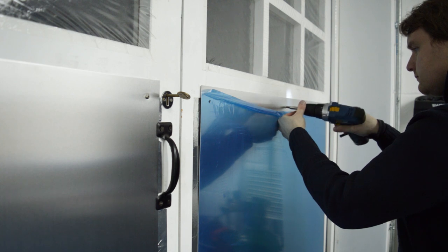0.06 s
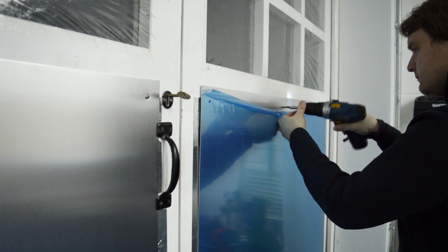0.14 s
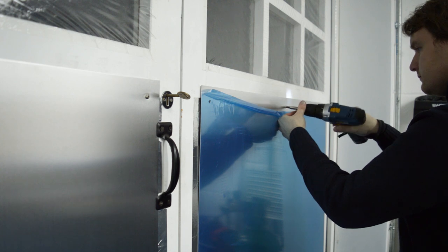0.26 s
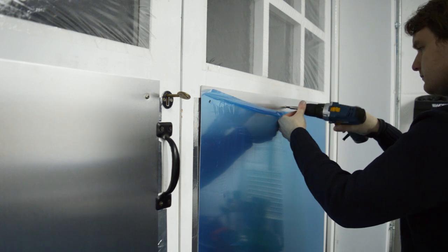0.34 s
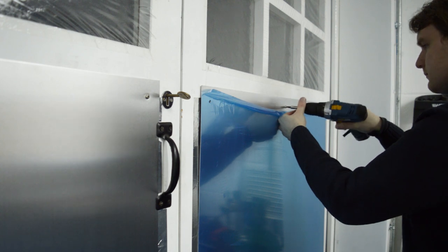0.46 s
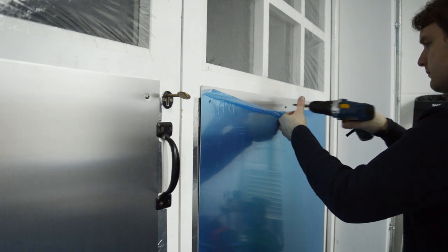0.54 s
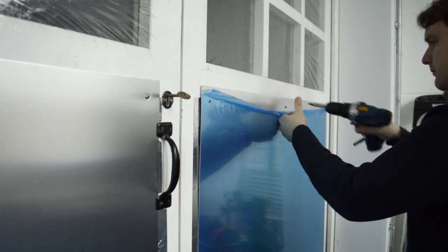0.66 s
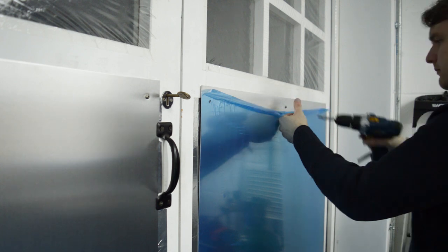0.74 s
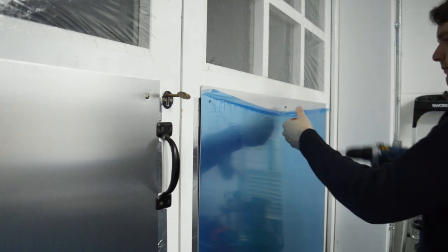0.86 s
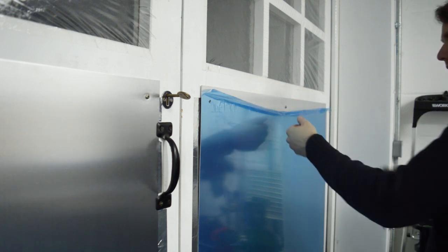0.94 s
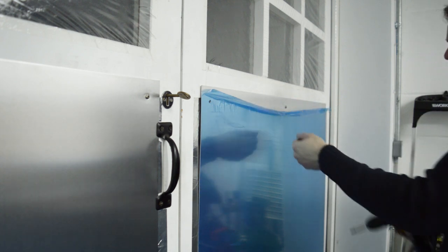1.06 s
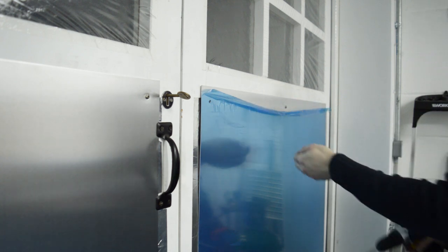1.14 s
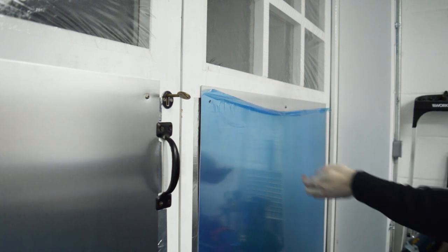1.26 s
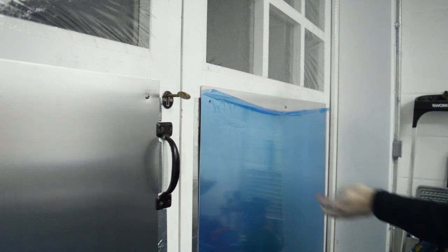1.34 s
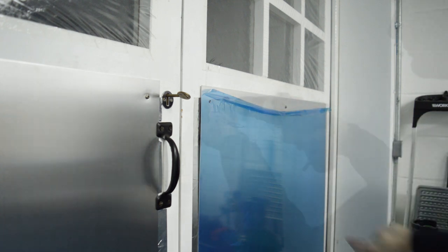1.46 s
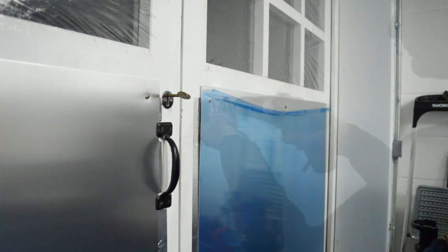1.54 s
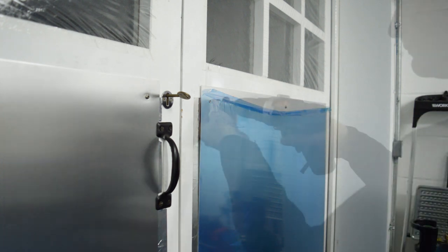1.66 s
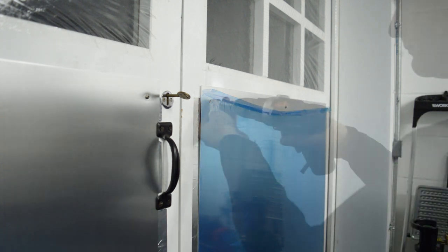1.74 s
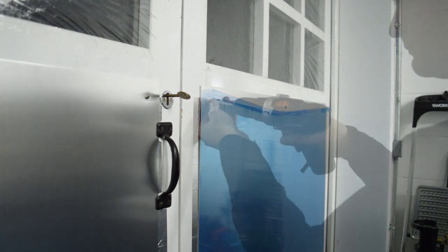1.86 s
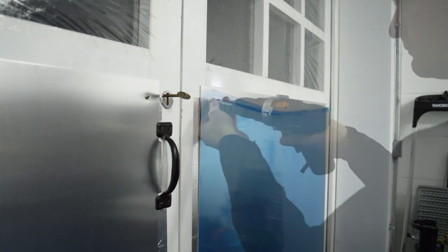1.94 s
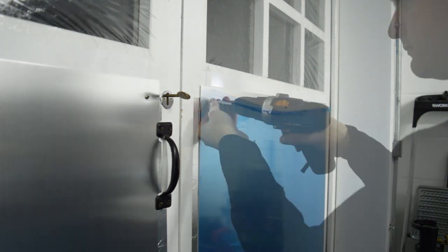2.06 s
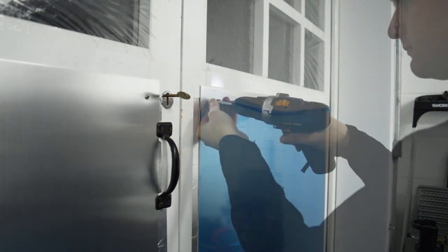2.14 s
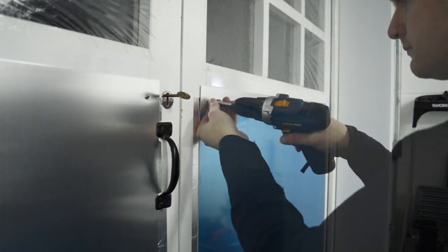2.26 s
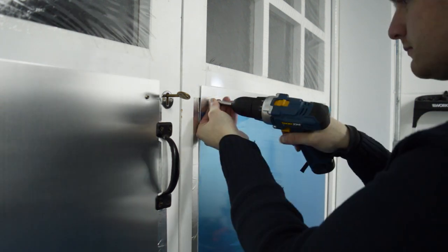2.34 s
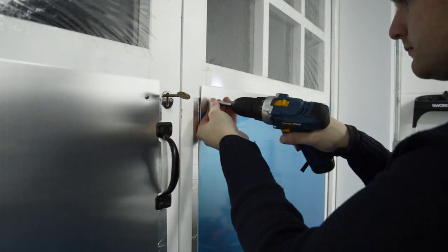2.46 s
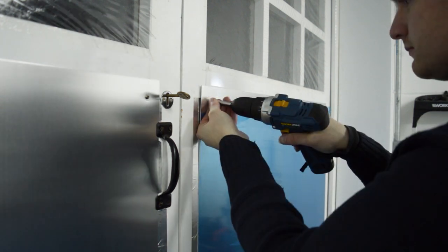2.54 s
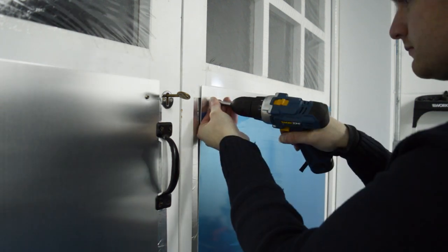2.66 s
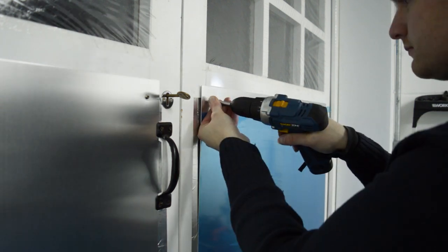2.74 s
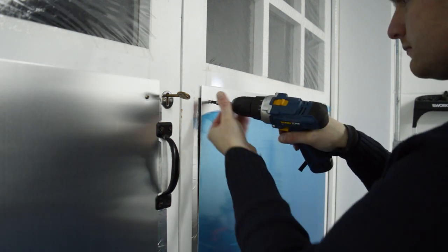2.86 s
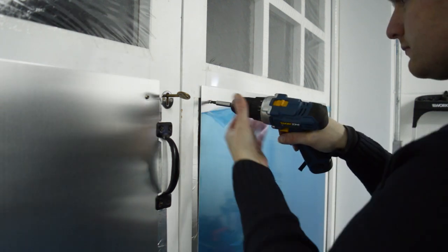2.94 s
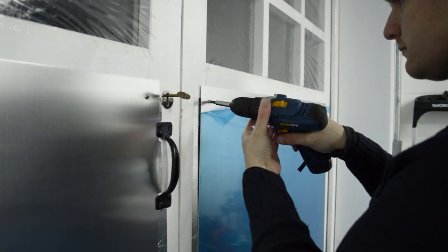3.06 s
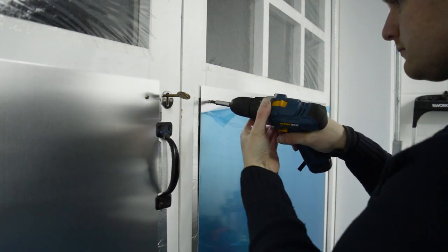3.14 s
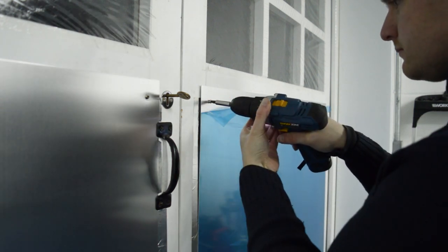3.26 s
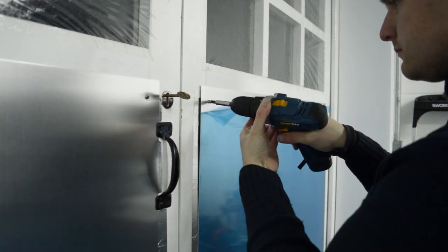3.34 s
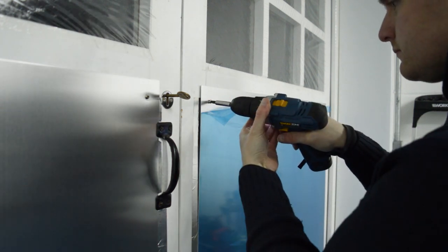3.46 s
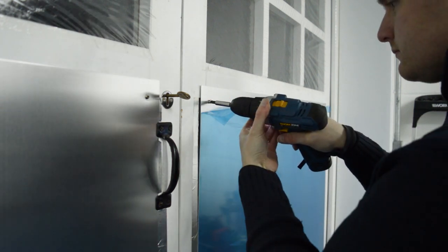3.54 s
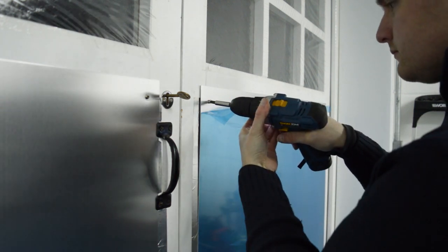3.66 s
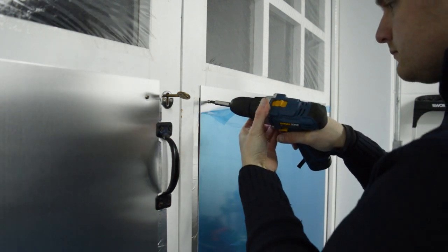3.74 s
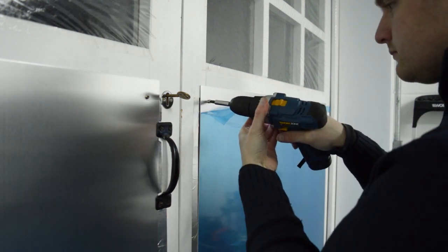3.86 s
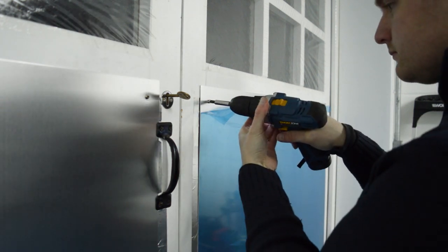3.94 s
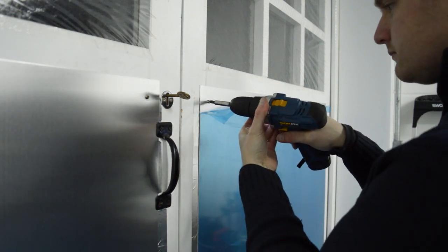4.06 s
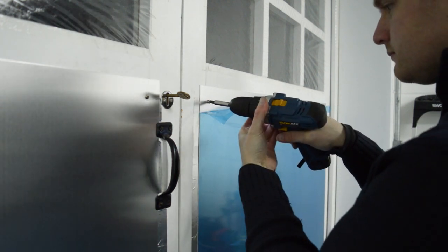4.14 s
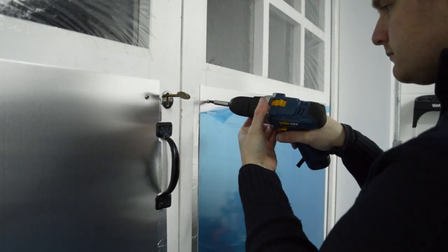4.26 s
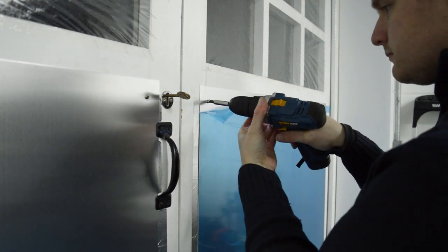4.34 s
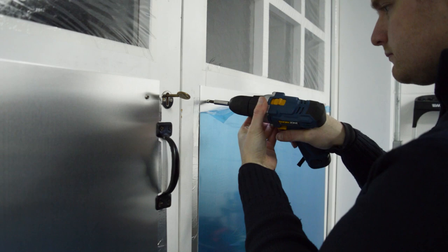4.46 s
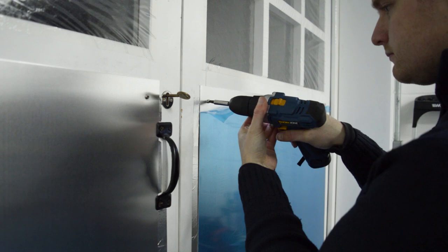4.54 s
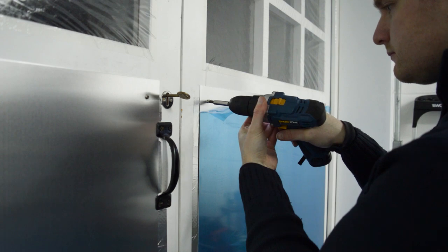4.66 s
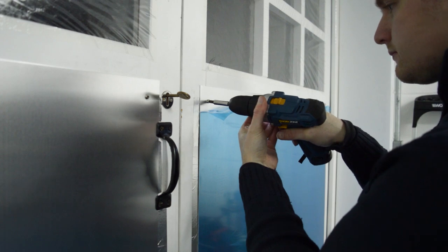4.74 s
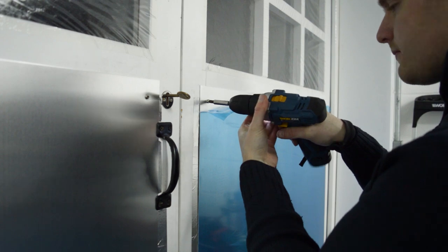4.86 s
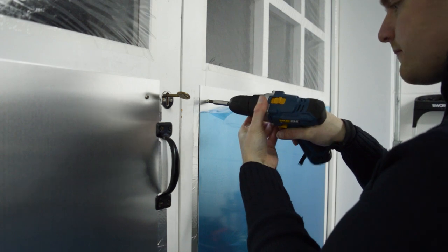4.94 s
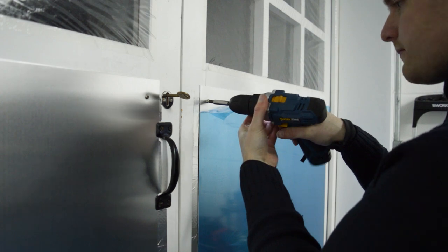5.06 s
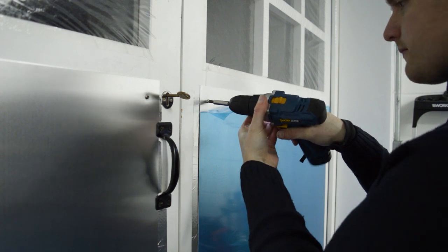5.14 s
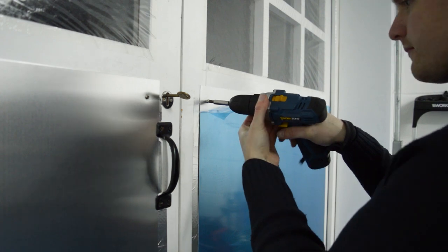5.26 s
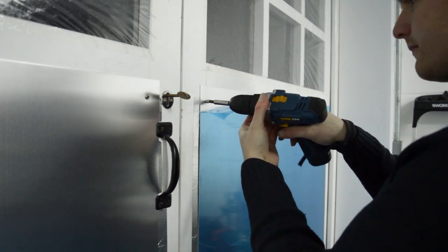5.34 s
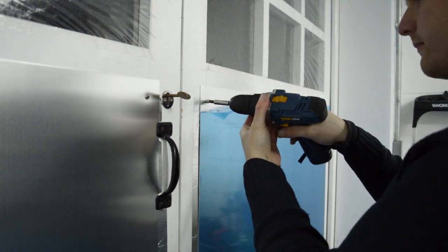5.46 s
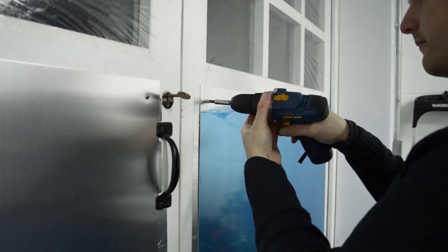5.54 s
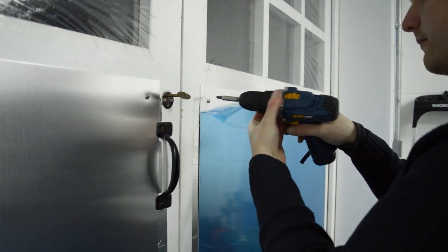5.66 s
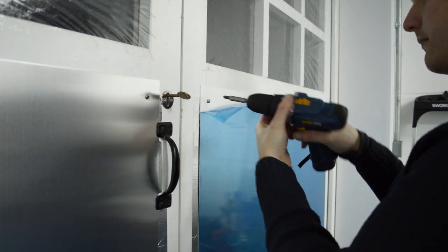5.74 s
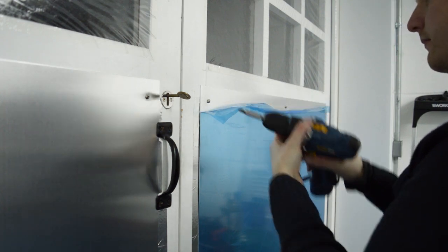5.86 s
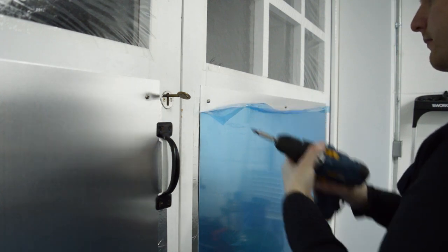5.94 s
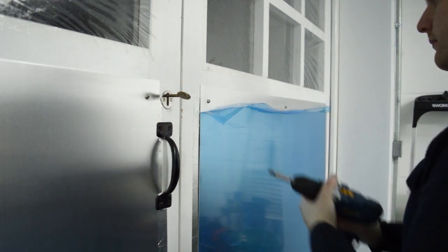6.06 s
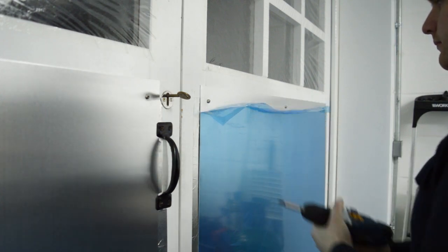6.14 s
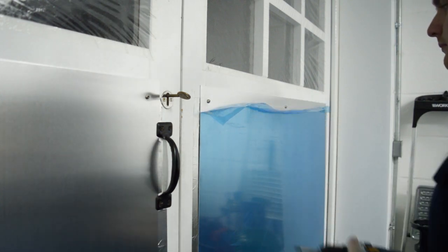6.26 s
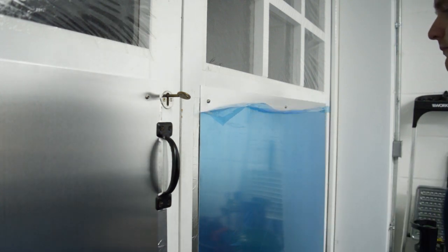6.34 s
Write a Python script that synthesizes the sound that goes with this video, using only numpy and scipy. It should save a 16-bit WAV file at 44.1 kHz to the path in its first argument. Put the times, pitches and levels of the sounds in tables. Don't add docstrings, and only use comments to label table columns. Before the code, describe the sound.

Close pickup in a reverberant, hard-walled workshop. A loud knock on a door panel dies away over faint room hum. A cordless driver grinds slowly, spins up quickly with a gritty gear whine and airy hiss, then winds down. Pressed to the door, it starts again low, rises and labours, with a thin electronic whine above. Rapid hard clutch snaps thud into the door, then it halts, leaving echo and faint ticks.

```python
import sys
import numpy as np
from scipy import signal
from scipy.fft import rfft, irfft
from scipy.io import wavfile
from scipy.ndimage import uniform_filter1d

SR = 44100
rng = np.random.default_rng(int(sys.argv[2]) if len(sys.argv) > 2 else 0)


def to_linear_factor(level_db):
    exponent = np.asarray(level_db, float) / 20
    return 10 ** exponent


def waveform_to_disk(signal):
    frames = np.transpose(np.atleast_2d(signal))
    scaled = np.clip(frames, -1, 1) * 32767
    samples = np.round(scaled).astype(np.int16)
    wavfile.write(sys.argv[1], SR, samples)


N = 282240

START_S, SLIP_S, STOP_S = 1.37, 4.875, 5.325
TOUCH_S = 2.97
MESH_PER_TURN = 9.32
TOP_HZ = 16300


def motor():
    t = np.arange(N) / SR
    speed, load = shaft_speed()
    law = levels(speed, load)
    swell = np.where(t < 1, 1, np.clip(t - START_S, 0, 1) ** 0.84)
    speed = speed * (1 + .0008 * drift(25))
    turns = np.cumsum(speed) / SR
    mesh_db, shaft_db = stage_levels()
    tones = gear_mesh(turns, speed, mesh_db + law["mesh"], law["sharp"], law["planets"])
    tones += commutator(turns, speed, shaft_db + law["commutator"], law["upper"])
    segments = np.cos(6 * np.pi * turns)
    whine = controller_whine(load, segments)
    noise = motor_noise(turns, segments, law)
    return swell * tones, swell * whine, swell * noise


# start in seconds, goal speed in turns/s, lag of the drift toward it in seconds.
TRIGGER_MOVES = [
    (1.831, 419, 2.225),
    (1.94, 133.5, .165),
    (2.271, 294.4, .048),
    (2.664, -883.2, 2.218),
    (2.963, 1.13, .347),
    (3.164, 73.9, .032),
    (3.238, 68.45, .987),
    (3.606, 114.3, .124),
]


def shaft_speed():
    creep_turns_per_s, bite_s, bite_loss_turns_per_s = 52.4, 4.087, 50
    t, speed = np.arange(N) / SR, np.full(N, creep_turns_per_s)
    for s, goal, lag_s in TRIGGER_MOVES:
        i = round(s * SR)
        speed[i:] = goal + (speed[i] - goal) * np.exp(-(t[i:] - s) / lag_s)
    load = np.clip((t - bite_s) / (SLIP_S - bite_s), 0, 1) ** 2.29
    return speed - bite_loss_turns_per_s * load, load


LEVEL_LAWS = {"mesh": (1, 2, 5.5, -4.5), "sharp": (-0.5, -0.16, 0.38, -0.17),
              "planets": (-1.2, -13, -0.5, 5.5), "commutator": (-0.5, 1, -7, 0), "upper": (-18, 39, 4.5, 1),
              "rumble": (-55.5, 7.5, 5.5, -2.5), "rattle": (-42.5, 14.5, 0, 3.5),
              "hiss": (-42.5, 18, 6, 0.7), "air": (-62, 39.5, 4, 5)}


def levels(speed, load):
    creep_below = 62
    creep = np.clip((creep_below + 8 - speed) / 16, 0, 1) * (load == 0)
    law = {}
    for name, (db, slope_db, load_db, creep_db) in LEVEL_LAWS.items():
        law[name] = db + slope_db * np.log10(speed / 110) + load_db * load + creep_db * creep
    return law


# gear mesh in dB, commutator in dB.
STAGE_LEVELS = [
    (-54.5, -60),
    (-51, -60),
    (-51, -67.5),
    (-45, -50.5),
    (-47.5, -53),
    (-50.5, -61),
    (-47, -69),
    (-48, -64.5),
    (-47.5, -62.5),
]


def stage_levels():
    stage = np.searchsorted(np.array(TRIGGER_MOVES)[:, 0], np.arange(N) / SR)
    return uniform_filter1d(np.array(STAGE_LEVELS, float)[stage].T, size=2500)


# frequency in Hz, level in dB.
HOUSING_RESPONSE = [(700, -15), (1050, -7), (1450, -9), (2000, -6), (2750, 2), (3150, 1), (3450, -3),
                    (3980, 1), (4150, -13), (4550, -5), (6300, -8), (7200, -13), (9700, -9), (13000, -28)]


def gear_mesh(turns, speed, mesh_db, sharp_db, planets_db):
    mesh_hz = MESH_PER_TURN * speed
    free_db = -9 * gate(TRIGGER_MOVES[0][0], TOUCH_S, edge_s=.05)
    mesh_orders = []
    for k in range(1, 17):
        housing_db = at_hz(HOUSING_RESPONSE, k * mesh_hz[::32]).repeat(32) - 99 * (k * mesh_hz > TOP_HZ)
        db = mesh_db + housing_db + sharp_db * (k - 4) + planets_db * (k % 3 == 0)
        db = db + free_db * (k == 1) - 2 * (k == 2)
        mesh_orders.append((k, db))
    return orders(MESH_PER_TURN * turns, mesh_orders, flicker_db=1.8, flicker_hz=20)


# multiple of shaft speed, level in dB.
SHAFT_TONES = [(1, 0), (2, -12), (3, 0), (6, -6), (9, -5), (12, -3), (18, -5), (19, 1), (21, -4), (25, -3),
               (27, -3), (28, 4), (30, 6), (31, 4), (33, 2), (34, -1), (35, -2), (36, 8), (37, -4),
               (38, -5), (40, -4), (41, -7), (43, -10), (45, -9), (46, -10), (48, -13), (50, -13),
               (52, -15)]


def commutator(turns, speed, shaft_db, upper_db):
    shaft_orders = []
    for k, db in SHAFT_TONES:
        small_body_db = 40 * np.log10(np.minimum(k * speed / 215, 1))
        shaft_orders.append((k, shaft_db + db + upper_db * (k > 12) + small_body_db))
    return orders(turns, shaft_orders, flicker_db=1.3, flicker_hz=10)


def orders(turns, levels_db, flicker_db, flicker_hz):
    out, on = np.zeros(N), slice(round(START_S * SR), round(SLIP_S * SR))
    for k, db in levels_db:
        gain = to_linear_factor((db + flicker_db * drift(flicker_hz))[on])
        out[on] += np.sqrt(2) * gain * np.sin(2 * np.pi * (k * turns[on] + rng.random()))
    return out


# on in seconds, off in seconds, level in dB.
CHOPPER_RUNS = [
    (0.093, 0.21, -51),
    (1.391, 1.846, -56),
    (1.854, 1.928, -45),
    (1.985, 2.264, -43.5),
    (3.228, 3.612, -47.5),
    (3.7, 4.873, -45),
]
# Hz at on, Hz at off.
CHOPPER_PITCH = [
    (3700, 3720),
    (3600, 3605),
    (3665, 3670),
    (3685, 3620),
    (3644, 3644),
    (3644, 3646),
]


def controller_whine(load, segments):
    moments, gain = [s for row in CHOPPER_RUNS for s in row[:2]], np.zeros(N)
    for on_s, off_s, db in CHOPPER_RUNS:
        gain += to_linear_factor(db) * gate(on_s, off_s, edge_s=0.01)
    gain = gain * to_linear_factor(-8.5 * load)
    hz = 78 * load ** 2 + np.interp(np.arange(N) / SR, moments, np.ravel(CHOPPER_PITCH))
    phase = 2 * np.pi * np.cumsum(hz) / SR
    wave = np.sin(phase) * (1 + .16 * segments) + to_linear_factor(-19) * np.sin(2 * phase)
    return np.sqrt(2) * wave * gain * to_linear_factor(1.5 + 1.2 * drift(20))


# frequency in Hz, dB per Hz.
RUMBLE_SPECTRUM = [(24, -49.5), (40, -21.5), (214, -2.5), (258, -9.5), (436, -10), (675, -2.5),
                   (792, -10.5), (1010, -4), (1120, -8.5), (1300, -8), (1690, -38), (2860, -120)]
RATTLE_SPECTRUM = [(710, -62), (1200, -26), (1370, -6.5), (2550, -9.5), (2870, -2.5), (3470, -3.5),
                   (3530, -6.5), (4140, -12.5), (5200, -8), (6760, -35.5), (11400, -120)]
HISS_SPECTRUM = [(2820, -30.5), (4800, -3), (5500, -4.5), (6260, 2.5), (7020, 0), (9470, 3), (10900, 0),
                 (11600, -4.5), (15100, -32.5), (22000, -120)]
AIR_SPECTRUM = [(6760, -34.5), (11500, 0), (12600, -2.5), (15200, -6), (15600, -13), (16200, -36)]
# frequency in Hz, width in Hz, level in dB.
BRUSH_HOLDER = [(5900, 120, 4), (9700, 250, 0)]
SLIP_NOISE_DB = (-45.5, -38, -46, -57.5)
EARLIER_NOISE_DB = (-33, -34, -40.5, -75.5)
EARLIER_NOISE_FALL = (170, 75, 135.2, 25)


def motor_noise(turns, segments, law):
    t = np.arange(N) / SR
    driven, slipping = gate(START_S, SLIP_S + .02), gate(SLIP_S, STOP_S + .01)
    earlier = gate(-1, .2, edge_s=.05)
    gains = []
    for name, slip_db, db, fall_db in zip(("rumble", "rattle", "hiss", "air"), SLIP_NOISE_DB,
                                          EARLIER_NOISE_DB, EARLIER_NOISE_FALL):
        gains.append(driven * to_linear_factor(law[name]) + slipping * to_linear_factor(slip_db) + earlier * to_linear_factor(db - fall_db * t))
    rumble_gain, rattle_gain, hiss_gain, air_gain = gains
    white = rng.standard_normal((3, N))
    teeth = 1 + 0.7 * np.cos(2 * np.pi * MESH_PER_TURN * turns)
    sparks = 1 + 0.13 * segments
    touch_db = 3 * gate(TOUCH_S, SLIP_S, edge_s=0.091)
    rumble = rumble_gain * to_linear_factor(touch_db + 2.0 * drift(33)) * coloured(white[0], RUMBLE_SPECTRUM)
    rattle = rattle_gain * to_linear_factor(-2.5 + 1.3 * drift(21)) * coloured(white[1] * teeth, RATTLE_SPECTRUM)
    hiss = hiss_gain * to_linear_factor(1.1 * drift(30)) * coloured(white[2] * sparks, HISS_SPECTRUM)
    hiss = hiss + sum(to_linear_factor(db) * resonance(hiss, hz, width_hz) for hz, width_hz, db in BRUSH_HOLDER)
    air = air_gain * coloured(white[0] * sparks, AIR_SPECTRUM)
    return rumble + rattle + hiss + air


# start in seconds, crack peak in dB, door thud in dB, bounce delay in seconds, bounce in dB.
CLUTCH_TEETH = [(.002, -26.5, -22, 0.0074, -10), (4.8756, -9.5, -19.5, 0.0041, -2.5),
                (4.9466, -10, -20.5, 0.0047, -1.5), (4.9913, -26.5, -34, .004, -6),
                (5.019, -10, -21.5, 0.004, 0), (5.059, -23, -44, 0.0033, -16),
                (5.082, -10.5, -21, 0.0041, 1.5), (5.1223, -16, -35.5, 0.0017, -17.5),
                (5.1464, -10, -24, 0.0066, -15.5), (5.2082, -9.5, -22.5, 0.0059, -4),
                (5.261, -49.5, -32.5, 0.005, -3.5), (5.2876, -10.5, -21, 0.0044, 1.5)]
# frequency in Hz, width in Hz, level in dB.
CLUTCH_MODES = [(3300, 200, 0), (3067, 58, 2), (4630, 600, -5), (9450, 830, -1)]
# start in seconds, length in seconds, start Hz, end Hz, level in dB.
GEAR_STRAIN = [
    (4.928, .015, 4600, 4300, -33),
    (4.93, .014, 3700, 3400, -33),
    (4.999, .019, 4200, 3680, -27),
    (5.067, .015, 4200, 3720, -26),
    (5.131, .015, 4200, 3920, -29),
    (5.192, .014, 4250, 3820, -27),
    (5.259, .009, 4050, 3950, -29),
    (5.269, .011, 4050, 3900, -29),
]


def clutch():
    cracks, blows = np.zeros(N), np.full(N, 1e-18)
    lowpass = signal.butter(2, 11500, fs=SR, output="sos")
    for s, db, thud_db, bounce_s, bounce_db in CLUTCH_TEETH:
        hit = np.zeros(N // 40)
        add(hit, 0, crack(decay_s=.0024))
        add(hit, bounce_s, to_linear_factor(bounce_db - 2.5) * crack(decay_s=.003))
        add(hit, .002, to_linear_factor(-15) * burst(rise_s=0.0016, decay_s=0.011))
        ring = to_linear_factor(1.0) * resonance(hit, 6470, 2000)
        ring += sum(to_linear_factor(mode_db) * resonance(hit, hz, width_hz) for hz, width_hz, mode_db in CLUTCH_MODES)
        ring = signal.sosfilt(lowpass, ring)
        add(cracks, s - .0004, to_linear_factor(db) * ring / np.abs(ring).max())
        add(blows, s + 0.0033, to_linear_factor(thud_db) * push(length_s=0.00042))
    for s, length_s, start_hz, end_hz, db in GEAR_STRAIN:
        hz = np.linspace(start_hz, end_hz, round(length_s * SR))
        groan = np.hanning(len(hz)) ** 0.78 * np.sin(2 * np.pi * np.cumsum(hz) / SR)
        add(cracks, s, to_linear_factor(db) * groan)
    return cracks, blows


def crack(decay_s):
    x = .7 * burst(rise_s=.0006, decay_s=decay_s)
    x[round(.0013 * SR)] += .8
    return x


# start in seconds, crack in dB, panel blow in dB.
DOOR_KNOCKS = [
    (0.19, -5, -15),
    (0.1955, -16, -3),
    (0.292, -50, -20),
]
# start in seconds, tick in dB, low bump in dB.
HANDLING_TICKS = [
    (.6844, -43, -94),
    (5.365, -36, -78),
    (.53, -66, -61),
    (.835, -54, -77.5),
    (5.603, -56, -55),
    (5.62, -50, -63),
    (5.893, -59, -90),
    (6.18, -64.5, -85.5),
]


def knocks():
    cracks, blows = np.zeros(N), np.zeros(N)
    bump = np.hanning(1300) * np.sin(2 * np.pi * 75 * np.arange(1300) / SR)
    for s, crack_db, panel_db in DOOR_KNOCKS:
        add(cracks, s, to_linear_factor(crack_db) * resonance(burst(rise_s=0.0001, decay_s=0.0013), 4000, 13000))
        add(blows, s, to_linear_factor(panel_db) * push(length_s=0.00015))
    for s, tick_db, bump_db in HANDLING_TICKS:
        add(cracks, s, to_linear_factor(tick_db) * resonance(burst(rise_s=0.00018, decay_s=0.0014), 11000, 7000))
        add(cracks, s, to_linear_factor(bump_db) * bump)
    return signal.sosfilt(signal.butter(2, 11000, fs=SR, output="sos"), cracks), blows


DOOR_MODES = {"knock": [(66.4, 31, -18, 0.7), (202, 180, 0, 0.28), (294, 20, -16, 0.64),
              (350, 48, -20.5, 0.45), (500, 31, -0.5, 0.17), (553, 270, -26.5, 0.25),
              (1026, 190, -9.5, 0.27), (1148, 420, -6, 0.32), (1280, 220, -7, 0.48),
              (450, 980, 6.5, 0.021)], "clutch": [(64.3, 40, -20.5, 0.68), (151, 77, -8, .2),
              (214, 29, -5, .16), (320, 190, -2, 0.29), (470, 49, -4, 0.22), (1049, 110, 0, 0.11),
              (1343, 800, -2.5, 0.27), (2000, 190, -4, 0.23), (503, 1300, -8, 0.047)]}


def door_panel(blows, striker):
    t, answer = np.arange(SR) / SR, 0
    for hz, width_hz, db, t60_s in DOOR_MODES[striker]:
        band = resonance(resonance(rng.standard_normal(SR), hz, width_hz), hz, 2 * width_hz)
        answer = answer + to_linear_factor(db - 60 * t / t60_s) * rms_one(band)
    return signal.fftconvolve(blows, to_linear_factor(-30.5) * answer)[:N]


# frequency in Hz, T60 in seconds.
WORKSHOP_T60 = [(60, 0.3), (260, 0.82), (700, 0.88), (1800, 0.85), (4800, 0.54), (10000, 0.32),
                (16000, 0.11)]


def workshop(x):
    t, tail = np.arange(SR) / SR, 0
    edges_hz = 40 * 2 ** np.arange(0, 9.1, 1)
    for low, high in zip(edges_hz, edges_hz[1:]):
        octave = signal.butter(2, [low, high], "band", fs=SR, output="sos")
        band = signal.sosfilt(octave, rng.standard_normal(SR))
        tail = tail + band * to_linear_factor(-60 * t / at_hz(WORKSHOP_T60, np.sqrt(low * high)))
    tail = tail * np.clip((t - .004) / 0.0015, 0, 1)
    return signal.fftconvolve(x, tail / np.sqrt(np.sum(tail ** 2)))[:N]


# frequency in Hz, dB per Hz.
FLOOR_SPECTRUM = [(18, -43.5), (30, -19.5), (55, 5.5), (75, -11), (118, -11.5), (222, -6.5), (503, -11.5),
                  (830, -8.5), (1140, -10.5), (1980, -12.5), (2140, -15), (2380, -13), (4850, -19.5),
                  (11900, -22), (16300, -26)]


def background():
    return to_linear_factor(-70) * coloured(rng.standard_normal(N), FLOOR_SPECTRUM)


def at_hz(points, hz):
    points = np.array(points)
    return np.interp(np.log(np.maximum(hz, 1)), np.log(points[:, 0]), points[:, 1])


def rms_one(x):
    return x / np.sqrt(np.mean(x ** 2) + 1e-20)


def drift(rate_hz):
    r = np.exp(-64 * np.pi * rate_hz / SR)
    slow = signal.lfilter([1], [1, -2 * r, r * r], rng.standard_normal(N // 32 + 502))[500:]
    return np.interp(np.arange(N) / 32, np.arange(len(slow)), rms_one(slow - slow.mean()))


def coloured(x, spectrum):
    hz = np.arange(N // 2 + 1) * SR / N
    inside = (hz > spectrum[0][0]) & (hz < spectrum[-1][0])
    return rms_one(irfft(rfft(x) * to_linear_factor(at_hz(spectrum, hz)) * inside, N))


def resonance(x, hz, width_hz):
    r = np.exp(-np.pi * width_hz / SR)
    zeros = np.array([1, 0, -1]) * (1 - r * r) / 2
    return signal.lfilter(zeros, [1, -2 * r * np.cos(2 * np.pi * hz / SR), r * r], x)


def burst(rise_s, decay_s, size=1500):
    t = np.arange(size) / SR
    x = rng.standard_normal(size) * (1 - np.exp(-t / rise_s)) * np.exp(-t / decay_s)
    return x / np.abs(x).max()


def push(length_s):
    return np.hanning(max(round(length_s * SR), 3))


def gate(on_s, off_s, edge_s=0.018):
    t = np.arange(N) / SR
    return np.clip(np.minimum(t - on_s, off_s - t) / edge_s, 1e-6, 1)


def add(out, s, x):
    i = round(s * SR)
    out[i:i + len(x)] += x[:N - i]


def scene():
    tones, whine, noise = motor()
    clutch_cracks, clutch_blows = clutch()
    knock_cracks, knock_blows = knocks()
    door = door_panel(clutch_blows, "clutch") + door_panel(knock_blows, "knock")
    to_room = to_linear_factor(-10) * tones + to_linear_factor(-10.5) * noise + to_linear_factor(-14) * door
    to_room += to_linear_factor(-8) * clutch_cracks + to_linear_factor(-1.5) * knock_cracks
    mid = to_linear_factor(-1.5) * (tones + whine + noise) + clutch_cracks + knock_cracks + door
    mid = mid + workshop(to_room) + background()
    crack_band = signal.butter(6, [4000, 12000], "band", fs=SR, output="sos")
    scatter = signal.sosfilt(crack_band, clutch_cracks * rng.standard_normal(N))
    return mid + to_linear_factor(-17) * scatter * np.array([[1], [-1]])


def band_limit(x):
    return signal.sosfilt(signal.butter(12, 16480, fs=SR, output="sos"), x)


def record(dry):
    top_cut = signal.cheby2(12, 60, TOP_HZ + 300, fs=SR, output="sos")
    mix = signal.sosfilt(top_cut, dry)
    return band_limit(mix)


dry = scene()
out = record(dry)
waveform_to_disk(out)
```